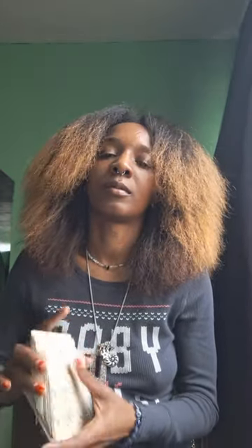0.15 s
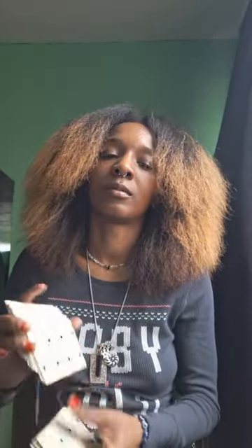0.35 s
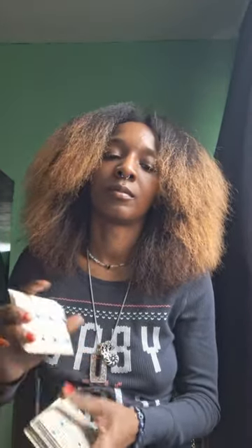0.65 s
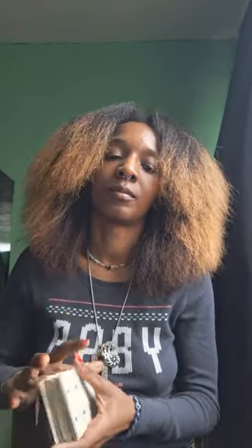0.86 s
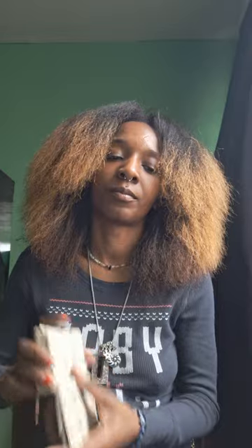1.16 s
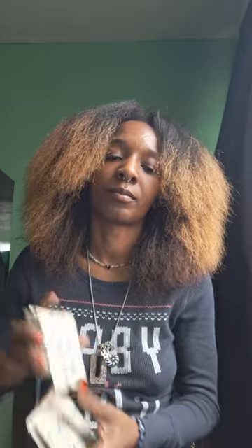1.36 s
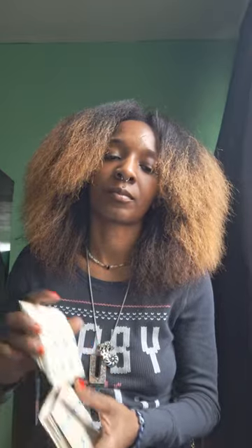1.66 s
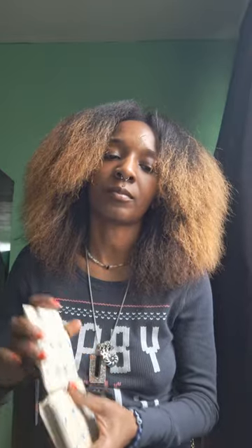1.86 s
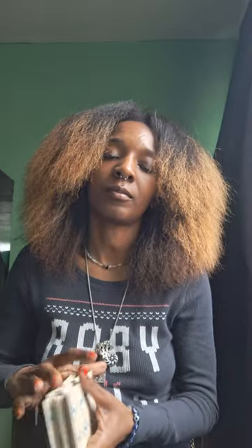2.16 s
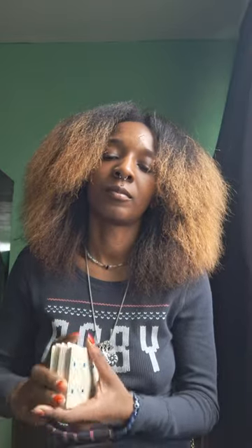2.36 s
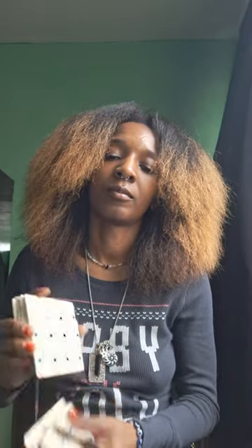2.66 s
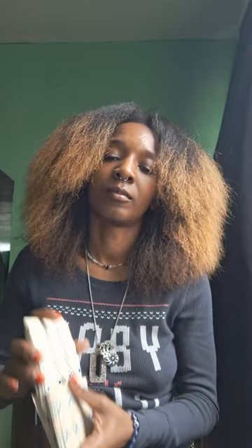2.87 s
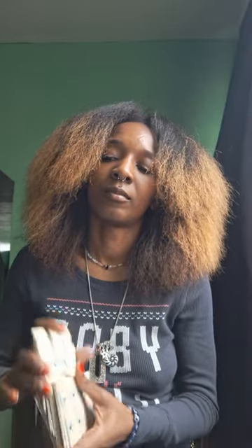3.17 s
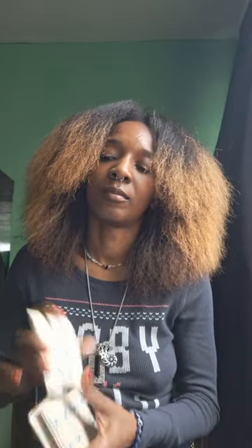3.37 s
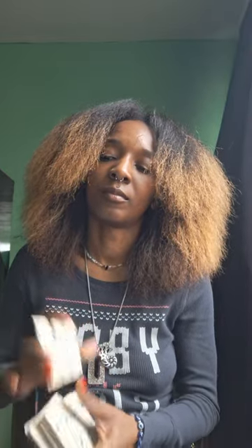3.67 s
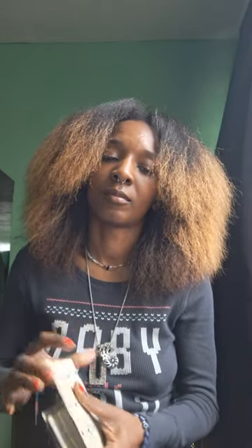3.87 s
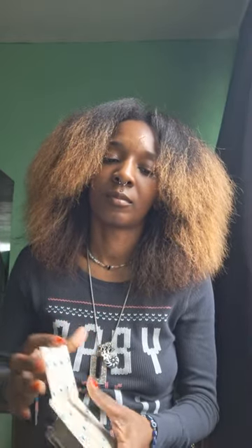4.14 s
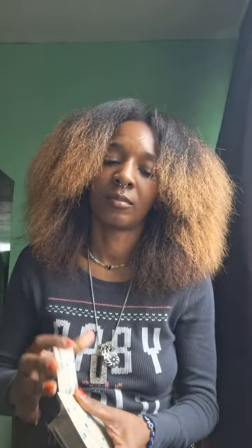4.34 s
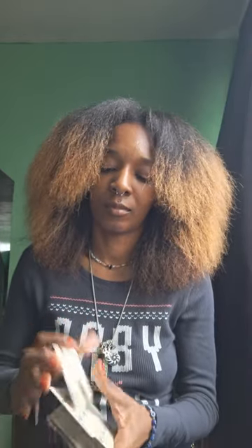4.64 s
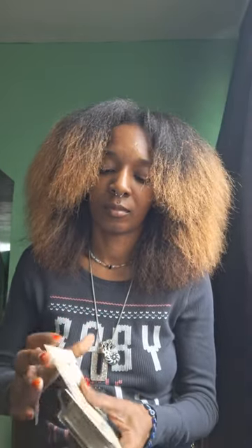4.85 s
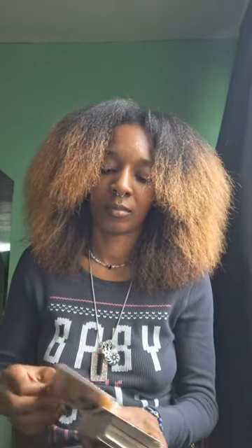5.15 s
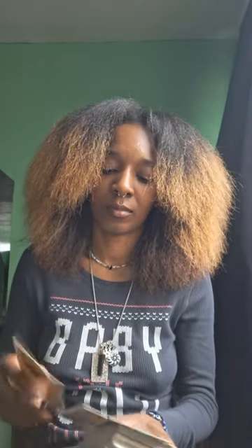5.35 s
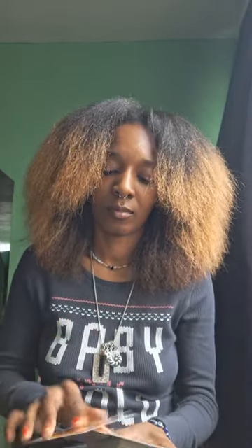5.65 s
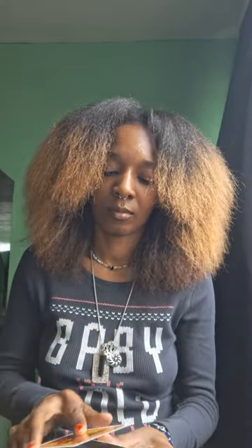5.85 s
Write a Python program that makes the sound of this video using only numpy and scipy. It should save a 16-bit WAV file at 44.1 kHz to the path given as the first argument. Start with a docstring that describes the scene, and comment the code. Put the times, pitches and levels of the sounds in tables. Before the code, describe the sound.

Large cards are shuffled by hand with quick papery slaps and hissing slides, then tapped square and cut in a quiet small room.

```python
"""A deck of large cards is shuffled overhand, close to a phone in a small quiet room.
For the first four seconds, about three times a second, a packet of cards slides off with a hiss,
patters down and knocks against the rest of the deck while the palm gives a dull thud.
Next, light taps square the cards. Last, the deck is cut and put together again.
All along a low rumble lies behind, and faint whistles come and go."""
import sys
import numpy as np
from scipy import signal
from scipy.fft import rfft, irfft
from scipy.io import wavfile
from scipy.ndimage import uniform_filter1d

SR = 44100
rng = np.random.default_rng(int(sys.argv[2]) if len(sys.argv) > 2 else 0)


def to_wav(sig):
    """Store sig (one row per channel, or 1-D mono) as 16-bit WAV at the path in sys.argv[1].

    Samples outside -1..1 are clipped; the rate is SR.
    """
    pcm = np.clip(np.atleast_2d(sig), -1, 1) * 32767
    pcm = np.round(pcm).astype(np.int16)
    wavfile.write(sys.argv[1], SR, pcm.T)  # frames by channels


N = 265041
TAPS = 2048  # filter length in samples
HZ = np.fft.rfftfreq(TAPS, 1 / SR)


# Falling packets. In all tables, levels are relative and a fade is the time to drop by 60 dB.
# (touch time [s], landing time [s], touch level [dB], patter level [dB], landing level [dB],
#  palm level [dB], cupped hand pitch [Hz], patter fade [s], brightness [dB per octave],
#  packet pitch [Hz], ring strength [dB])
PACKET_DROPS = [(0.0, 0.025, -63, -42, -38, -43.5, 435, 0.083, -0.5, 3400, 5),
                (0.1998, .2092, -41.5, -46, -22, -61, 400, 0.37, -1, 1810, 15.5),
                (0.5294, 0.5478, -40, -47, -30, -61, 170, 0.3, -0.5, 1831, 13.5),
                (0.835, 0.867, -35.5, -50, -24, -57, 418, 0.067, -0.5, 3330, 5),
                (1.276, 1.2883, -64, -40, -35.5, -45.5, 400, .03, -1, 1290, 10),
                (1.4814, 1.4997, -44.5, -47, -39, -54, 355, 0.12, -2, 2140, 2),
                (1.799, 1.838, -41, -42.5, -52, -58, 170, .1, 0, 1800, 16),
                (2.126, 2.167, -43, -42.5, -31, -53.5, 170, 0.029, -0.5, 1720, 10),
                (2.633, 2.642, -31, -36, -31, -53, 160, 0.041, 2.5, 1600, 10),
                (2.829, 2.843, -31, -35.5, -34, -47, 167, 0.24, -.5, 2100, 15),
                (3.137, 3.171, -46, -45, -29, -63, 162, 0.26, 0, 1850, 14),
                (3.468, 3.527, -40.5, -48, -38.5, -56, 203, 0.12, -1, 1700, 12),
                (3.773, 3.831, -50, -58, -42.5, -58.5, 168, .07, 3.5, 1820, 14),
                (4.167, 4.223, -53.5, -61, -46, -75, 190, 0.13, -8, 1890, -1),
                (5.353, 5.439, -50, -52, -38.5, -44.5, 189, 0.077, 4.5, 3886, 2),
                (5.7, 5.7058, -32.5, -37, -30.5, -40.5, 233.2, 0.13, -2, 2717, 3)]

def falling_packets(slip_s=0.006, palm_lag_s=0.00303):
    """Each packet slips, touches the deck with one edge, patters down and lands on the palm."""
    out = np.zeros(N)
    for (touches, lands, touch_db, patter_db, landing_db, palm_db,
         hand_hz, fade_s, tilt_db, pitch_hz, ring_db) in PACKET_DROPS:
        slips = max(touches - slip_s, 0)
        add(out, slips, patter(lands - slips, touch_db - 9.5, patter_db, fade_s, tilt_db, pitch_hz))
        add(out, touches, knock(touch_db, tilt_db - 0.5, pitch_hz, ring_db))
        add(out, lands, knock(landing_db, tilt_db, pitch_hz, ring_db))
        add(out, lands + palm_lag_s, thud(palm_db, hand_hz))  # the palm gives way just after
    return out


def knock(db, tilt_db, pitch_hz, ring_db):
    """A stiff edge hits at once, with a brief crunch as its neighbours follow, and the packet rings."""
    t = np.arange(TAPS // 4) / SR
    crunch = .22 * np.exp(-t / .0009) * rng.standard_normal(len(t))
    blow = even_burst((t == 0) + crunch)
    sound = colour(blow, packet_tone(tilt_db, pitch_hz, ring_db, width_hz=300))
    return amp(db + 19.5) * sound / np.linalg.norm(sound)


def patter(rise_s, from_db, peak_db, fade_s, tilt_db, pitch_hz):
    """Card after card lands, then the sound dies away as the packet settles."""
    peak_s = max(rise_s, .002)
    t = np.arange(round((peak_s + fade_s) * SR)) / SR
    rising_db = (peak_db - from_db) * (t / peak_s - 1)
    fading_db = -60 * (t - peak_s) / fade_s
    loudness = amp(peak_db + np.where(t < peak_s, rising_db, fading_db))
    soft_start = np.minimum(t / 0.01, 1)
    contacts = friction(SR, per_s=1200, spread_db=3, smooth=0.65)[:len(t)]
    tone = packet_tone(tilt_db, pitch_hz, ring_db=4, width_hz=.15 * pitch_hz)
    return colour(contacts * soft_start * loudness, tone)


# How strong each pitch is in the sound of card paper: (frequency [Hz], level [dB])
PAPER_TONE = [(30, -20), (200, -7.5), (450, -5), (560, -10), (720, 0.5), (950, -7), (1500, -3.5), (2500, 1),
              (3500, 0.5), (5500, -1.5), (8000, -1.5), (12000, -6), (16000, -2.5)]

def packet_tone(tilt_db, pitch_hz, ring_db, width_hz):
    """Card paper, made brighter or duller for each hit, with the packet ringing at one pitch."""
    octaves = np.log2(np.maximum(HZ, 1500) / 3000)
    return look_up(PAPER_TONE, HZ) + tilt_db * octaves + ring_db * hump(HZ, pitch_hz, width_hz)


# The dull tone of the palm: (frequency [Hz], level [dB])
PALM_TONE = [(25, -34), (70, -1), (130, -6), (230, 7.5), (320, -11.5), (450, -7.5), (800, -13), (3000, -54)]

def thud(db, hand_hz, rise_s=0.00406):
    """The soft palm takes the weight of the cards with a short, hollow push."""
    t = np.arange(2 * TAPS) / SR
    push = t / rise_s * np.exp(1 - t / rise_s)
    tone = look_up(PALM_TONE, HZ) + 6 * hump(HZ, hand_hz, width_hz=55)
    sound = colour(even_burst(push * rng.standard_normal(len(t))), tone)
    return amp(db) * np.linalg.norm(push) * sound / np.linalg.norm(sound)


# Single card edges hitting:
# (time [s], level [dB], brightness [dB per octave], pitch [Hz], ring strength [dB])
EDGE_CLICKS = [(0.2175, -36, 1, 2240, 12), (.2239, -28.5, 1, 1920, 16), (0.2298, -35, -7, 2502, 13),
               (.537, -37, 3, 2000, 10), (.633, -54, -10, 1730, 6), (.875, -38, -2, 2450, 14),
               (1.292, -41.5, -11.5, 1672, 11), (1.958, -45.5, -2, 2103, -9), (2.145, -35, -1, 1750, 13),
               (2.427, -52.5, 0.5, 2400, -7), (2.655, -38, -1, 1614, 4), (2.769, -54, 4, 3000, -4),
               (3.1618, -29, 1.5, 2000, 16), (3.177, -25, 1, 4700, 11.5), (3.3159, -42.5, 1.5, 2470, 3),
               (3.471, -37, -6.5, 1670, 6), (3.523, -31, 9.5, 1783, 3), (4.248, -52, -4.5, 2970, 1),
               (4.302, -51, -4.5, 2800, -17), (4.412, -56, -0.5, 1915, 10), (4.531, -54, -3.5, 1917, -2),
               (4.7275, -40, 0, 2670, 1.5), (4.803, -51.5, -4, 2400, -11), (4.925, -58, 2.5, 1500, 11),
               (4.962, -58, -2, 1190, 19), (5.012, -49.5, -2, 1247, 16.5), (5.04, -59.5, -4, 1260, 15),
               (5.096, -48.5, 5.5, 1420, 21), (5.439, -41.5, -3, 1730, 0), (5.6245, -36, -0.5, 1720, -0.5)]

def clicks(rustle_fade_s=0.13):
    """An edge clicks as a packet bounces or the deck is squared, then loose cards rustle and settle."""
    out = np.zeros(N)
    for s, db, tilt_db, pitch_hz, ring_db in EDGE_CLICKS:
        rustle_db = db - 20
        add(out, s, knock(db, tilt_db, pitch_hz, ring_db))
        add(out, s, patter(0, rustle_db, rustle_db, rustle_fade_s, tilt_db, pitch_hz))
    return out


# Cards drawn over each other:
# (start [s], end [s], swell over the stroke [dB], hiss level [dB], scrape level [dB])
STROKES = [(0, 0.015, -28.5, -38.5, -65), (.27, 0.359, 1, -58.5, -55.5), (0.368, 0.496, -7.5, -86, -70.5),
           (1.048, 1.11, -8, -67, -83.5), (1.145, 1.283, 15.5, -43, -64), (1.52, 1.605, -2.5, -51.5, -58),
           (1.614, 1.705, 1.5, -55.5, -66.5), (1.865, 1.982, -9, -56.5, -59),
           (2.337, 2.443, 13, -55.5, -68.5), (2.47, 2.641, 26.5, -36.5, -54), (2.77, 2.83, -7, -67, -91),
           (2.93, 3.14, -8.5, -59, -69.5), (2.986, 3.018, -1, -50, -72), (3.23, 3.31, -11, -65, -68),
           (3.861, 4.027, 2.5, -50, -71), (4.792, 4.882, -5, -60.5, -82), (5.175, 5.42, 3.5, -54, -82),
           (5.642, 5.706, 4, -53, -53), (5.826, 5.92, 4.5, -67, -64), (5.972, 6.01, 3, -65, -67.5)]
# The bright tone of card faces rubbing: (frequency [Hz], level [dB])
HISS_TONE = [(100, 6.5), (900, -16), (2000, -22), (3500, -5), (6000, 1), (9000, 2.5), (12000, 2.5),
             (16000, 10.5)]

def sliding_cards(rise_s=0.02, fade_s=0.068):
    """Card faces rub with a fine, bright hiss, and their edges with a duller scrape."""
    t = np.arange(SR) / SR
    faces, edges = np.zeros(N), np.zeros(N)
    for start, end, swell_db, hiss_db, scrape_db in STROKES:
        length = end - start
        level_db = np.where(t < length, swell_db * (t / length - 1), -60 * (t - length) / fade_s)
        stroke = np.minimum(t / rise_s, 1) * amp(level_db)
        add(faces, start, amp(hiss_db) * stroke)
        add(edges, start, amp(scrape_db) * stroke)
    faces *= friction(N, per_s=1900, spread_db=4.5, smooth=1)
    edges *= friction(N, per_s=1600, spread_db=8, smooth=0.45)
    hiss = colour(faces, look_up(HISS_TONE, HZ))
    scrape = colour(edges, packet_tone(tilt_db=-2, pitch_hz=2000, ring_db=4, width_hz=350))
    return (amp(-2) * hiss + scrape)[:N]


def friction(size, per_s, spread_db, smooth):
    """Paper rubs in tiny slips of uneven size, on top of a smooth noise."""
    slips = (rng.random(size) < per_s / SR) * rng.choice([-1, 1], size)
    sizes = amp(spread_db * np.minimum(rng.exponential(1, size), 3.5))
    return unit_power(unit_power(slips * sizes) + smooth * rng.standard_normal(size))


# Soft bumps of the deck: (time [s], level [dB], cupped hand pitch [Hz])
HAND_BUMPS = [(2.916, -50.5, 159), (4.632, -57.5, 165), (4.728, -51.5, 160), (4.81, -52.5, 200),
              (4.965, -51, 260), (5.064, -50.5, 170), (5.626, -45.5, 224), (5.74, -47.5, 225)]

def bumps(early_s=0.00303):
    """The deck bumps against the palm as the grip changes."""
    out = np.zeros(N)
    for s, db, hand_hz in HAND_BUMPS:
        add(out, s - early_s, thud(db, hand_hz))
    return out


# Thin whistles, perhaps squeaking cards or small birds far off:
# (time [s], length [s], first pitch [Hz], last pitch [Hz], width [Hz], level [dB])
FAINT_WHISTLES = [(0, 0.32, 1935, 2000, 220, -61.5), (0.251, 0.59, 2000, 2026, 190, -64.5),
                  (.41, .14, 4800, 5100, 700, -68), (2.28, .11, 8800, 7700, 650, -64.5),
                  (2.31, .09, 7200, 6200, 750, -66), (2.502, .13, 7100, 7316, 550, -61),
                  (3.337, .1, 7100, 6000, 550, -73), (3.55, 0.18, 7200, 6600, 550, -76),
                  (3.762, 0.13, 7850, 7220, 448, -62), (3.84, 0.32, 1933, 1860, 170, -68),
                  (4.1, 1, 1940, 1885, 170, -77), (4.397, 0.27, 6400, 7020, 350, -81),
                  (5.35, 0.098, 3570, 4400, 900, -59.5), (5.49, .11, 6100, 6260, 350, -80)]

def whistles():
    """Each whistle is a narrow, fuzzy band of noise that glides, swells and fades."""
    out = np.zeros(N)
    for s, length, from_hz, to_hz, width_hz, db in FAINT_WHISTLES:
        size = round(length * SR)
        noise = rng.standard_normal((2 * SR, 2)) @ [1, 1j]
        fuzz = signal.lfilter(*signal.butter(2, width_hz / 2, fs=SR), noise)[-size:]
        glide = np.exp(2j * np.pi * np.cumsum(np.linspace(from_hz, to_hz, size)) / SR)
        tone = unit_power((fuzz * glide).real)
        add(out, s, amp(db - 4) * tone * signal.windows.tukey(size, .6))
    return out


# The tone of the background noise: (frequency [Hz], level [dB])
RUMBLE_TONE = [(15, -36), (28, -22), (45, -1.5), (62, 3.5), (80, -3.5), (110, -5), (135, -16.5),
               (185, -8.5), (260, -11.5), (350, -22), (540, -30), (820, -23), (1100, -33), (1800, -33),
               (3000, -41), (6800, -37.5), (10000, -45.5), (16000, -38.5)]
# Low pitches at which the room booms: (frequency [Hz], width [Hz], boost [dB])
ROOM_BOOMS = [(97.8, 10.7, 14.5), (163.8, 9.5, 12), (239, 7.2, 2.5)]
# The rumble slowly gets louder and softer: (time [s], level [dB])
RUMBLE_DRIFT = [(0, -41), (.15, -51.5), (.39, -46.5), (.52, -54), (1.4, -55), (3, -54), (5.3, -56),
                (6, -54)]

def rumble(likeness=0.94, hiss_db=-55, lean_left_db=0.66):
    """Low noise booms in the room, much alike on both sides, with a thin steady hiss above it."""
    hz = np.fft.rfftfreq(N, 1 / SR)
    booms_db = sum(db * hump(hz, f, width) for f, width, db in ROOM_BOOMS)
    tone = unit_power(amp(look_up(RUMBLE_TONE, hz) + booms_db))
    shared, left, right = rfft(rng.standard_normal((3, N)))
    lows = 1 / (1 + (hz / 420) ** 4)
    same = likeness * lows
    spectrum = (np.sqrt(same) * shared + np.sqrt(1 - same) * np.array([left, right])) * tone
    drift = amp(np.interp(np.arange(N) / SR, *np.transpose(RUMBLE_DRIFT)))
    boom = irfft(spectrum * lows, N) * drift * amp([[lean_left_db], [-lean_left_db]])
    hiss = irfft(spectrum * (1 - lows), N) * amp(hiss_db)
    return boom + hiss


# Bounces off near surfaces, then between floor and ceiling: (delay [s], level [dB])
EARLY_ECHOES = [(.0006, -5), (.0021, -12), (.0027, -26.5), (.0071, -1), (.0089, -4.5), (0.0156, -3),
                (0.015, -6), (0.02, -41)]

def with_echoes(x, scatter_s, dull_above_hz=9000):
    """The sound arrives straight from the hands, then again as duller echoes."""
    paths = np.zeros(TAPS)
    for delay, db in EARLY_ECHOES:
        add(paths, delay + scatter_s * rng.uniform(-0.81, 1), amp([db]))
    paths = signal.lfilter(*signal.butter(1, dull_above_hz, fs=SR), paths)
    paths[0] += 1  # the straight path
    return signal.oaconvolve(x, paths)[:N]


# How long each pitch lingers in the room: (frequency [Hz], fade [s])
ROOM_FADES = [(200, 0.18), (700, 0.44), (1800, 0.2), (4600, 0.19), (12000, 0.14)]

def room_tail(x, low_cut_hz=450, size=256):
    """The room stores sound at every pitch and lets it leak away as noise."""
    highs = signal.lfilter(*signal.butter(1, low_cut_hz, "high", fs=SR), x)
    hz, _, bands = signal.stft(highs, SR, nperseg=size)
    fed = abs(uniform_filter1d(abs(bands) ** 2, size=3, axis=0))
    kept = amp(-60 * size / 2 / SR / look_up(ROOM_FADES, hz)) ** 2  # share of power left after a step
    stored = np.zeros_like(fed)
    for k in range(1, fed.shape[1]):
        stored[:, k] = kept * stored[:, k - 1] + (1 - kept) * fed[:, k - 1]
    noise = signal.stft(rng.standard_normal(N), SR, nperseg=size)[2]
    leaking = noise * np.sqrt(stored / np.mean(abs(noise) ** 2))
    return signal.istft(leaking, SR, nperseg=size)[1][:N]


def amp(db):
    """Turns decibels into a number to multiply by."""
    return 10 ** (np.asarray(db) / 20)


def unit_power(x):
    """Scales a signal to an average power of one."""
    return x / np.sqrt(np.mean(x ** 2) + 1e-20)


def look_up(points, hz):
    """Reads a table at any frequency, filling in between its rows."""
    f, value = np.transpose(points)
    return np.interp(np.log(hz + 1), np.log(f), value)


def hump(hz, centre_hz, width_hz):
    """A peak of height one around a ringing pitch."""
    return 1 / (1 + ((hz - centre_hz) / width_hz) ** 2)


def add(mix, s, sound):
    """Mixes a sound in at s seconds."""
    part = mix[max(round(s * SR), 0):][:len(sound)]
    part += sound[:len(part)]


def sharp_filter(tone_db):
    """The sharpest click that has this tone, for use as a filter."""
    log_gain = np.log(amp(np.r_[tone_db, tone_db[-2:0:-1]]))
    return np.fft.ifft(np.exp(np.conj(signal.hilbert(log_gain)))).real


def colour(x, tone_db):
    """Gives a sound this tone; white noise keeps its power."""
    taps = sharp_filter(tone_db)
    return signal.fftconvolve(x, taps / np.linalg.norm(taps))


def even_burst(burst):
    """Evens out a burst's spectrum so that no stray pitch sticks out."""
    spectrum = rfft(burst)
    return irfft(spectrum / (abs(spectrum) + 1e-9) ** .7)[:len(burst) // 2]


# The tone of the left and right microphone openings: (frequency [Hz], level [dB])
LEFT_TONE = [(80, 3.5), (250, -0.5), (500, -4.5), (1000, -8.5), (1700, -7), (3000, -7.5), (5000, -11.5),
             (7000, -9), (8300, -7.5), (10000, -9), (13000, -18.5), (16000, -24)]
RIGHT_TONE = [(80, 6.5), (250, 0), (1700, 0.5), (5000, 3), (7300, 1), (8000, -8), (9000, -6), (10500, 0),
              (13000, 2.5), (15500, -1)]

def microphone(x, tone, lag_samples, tail_db, scatter_s):
    """One opening hears the sound, its echoes and the room's tail, and adds its own tone."""
    heard = with_echoes(x, scatter_s) + amp(tail_db) * room_tail(x)
    coloured = signal.oaconvolve(heard, sharp_filter(look_up(tone, HZ)))
    return np.r_[np.zeros(lag_samples), coloured][:N]


def scene():
    """The cards sound a little to the right, over the rumble of the room."""
    sounds = falling_packets() + clicks() + bumps() + sliding_cards() + whistles()
    left = microphone(sounds, LEFT_TONE, lag_samples=5, tail_db=3.5, scatter_s=.00007)
    right = microphone(sounds, RIGHT_TONE, lag_samples=0, tail_db=2.5, scatter_s=.00002)
    return amp(-1.5) * np.array([left, right]) + rumble()


def record(dry):
    """The phone cuts off the very highest pitches, above 15900 Hz."""
    low_pass = signal.firwin(511, 15900, window=("kaiser", 9), fs=SR)
    return signal.oaconvolve(dry, low_pass[None], "same")


dry = scene()
out = record(dry)
to_wav(out)
```